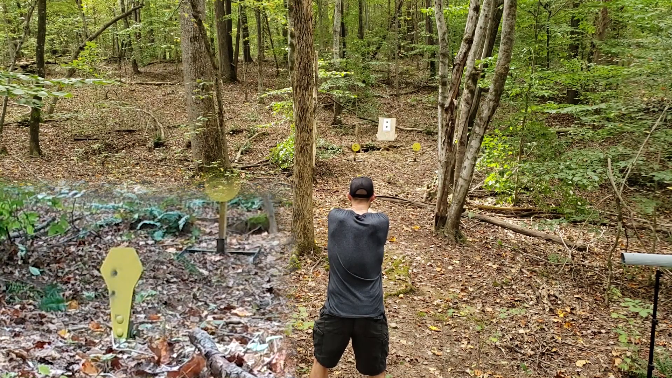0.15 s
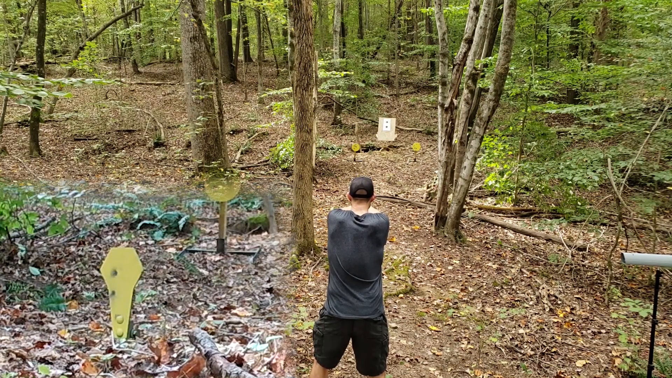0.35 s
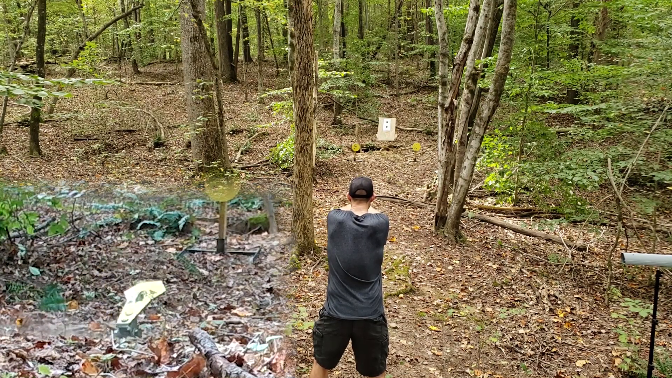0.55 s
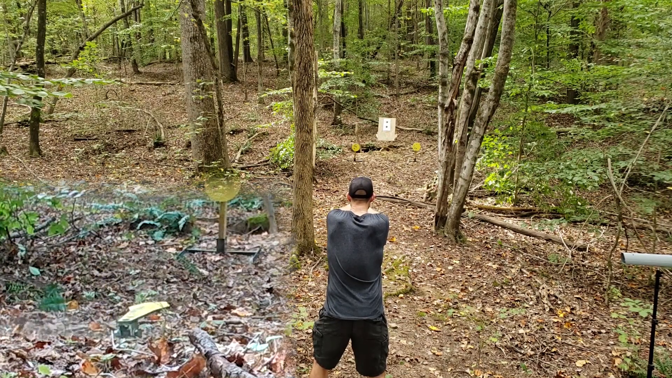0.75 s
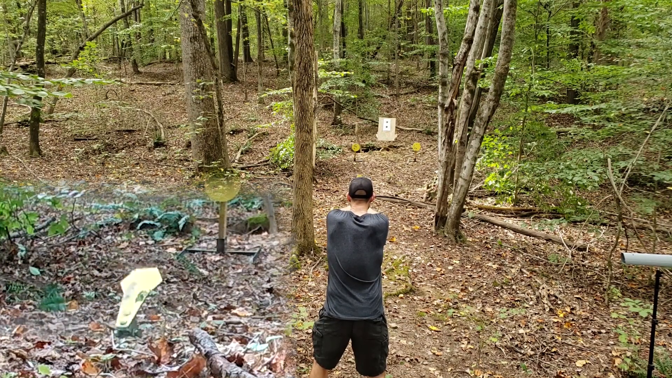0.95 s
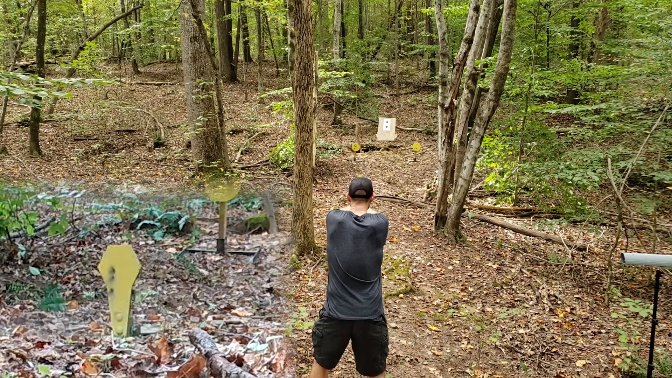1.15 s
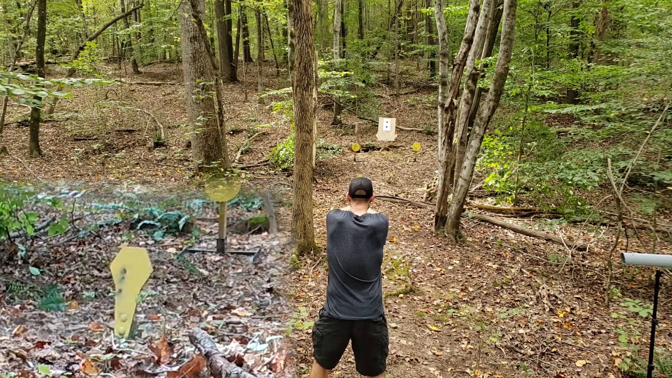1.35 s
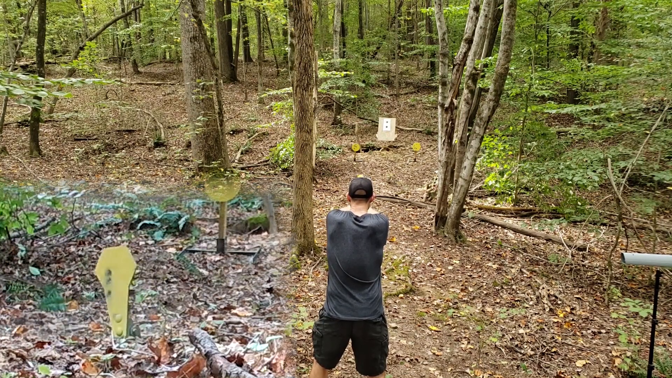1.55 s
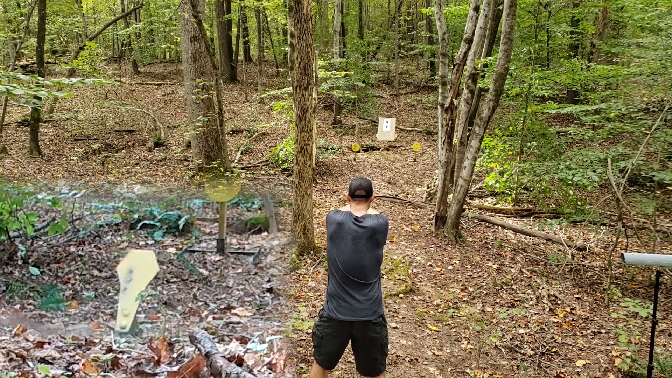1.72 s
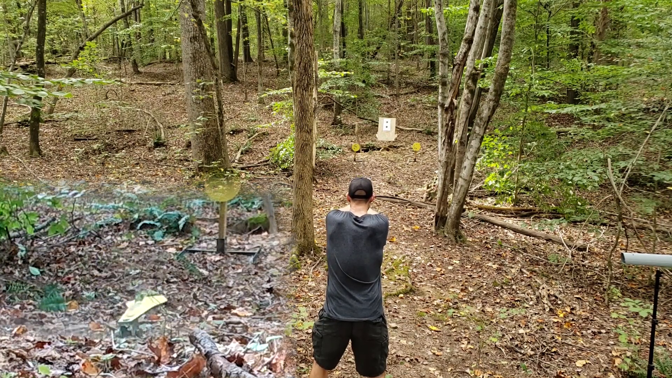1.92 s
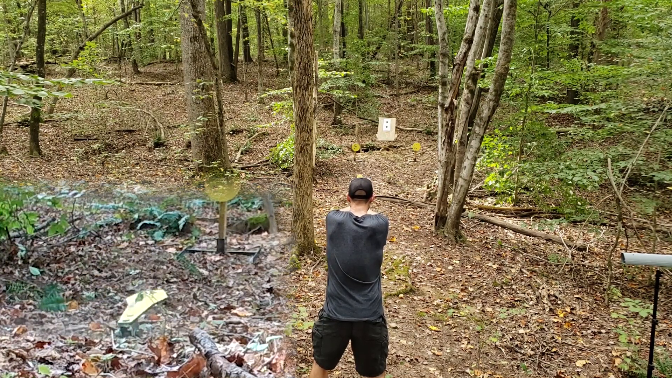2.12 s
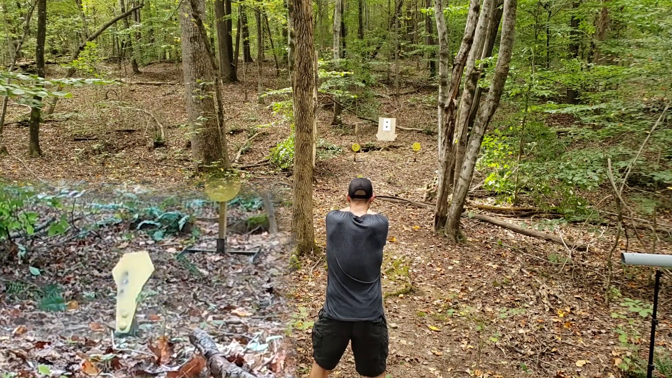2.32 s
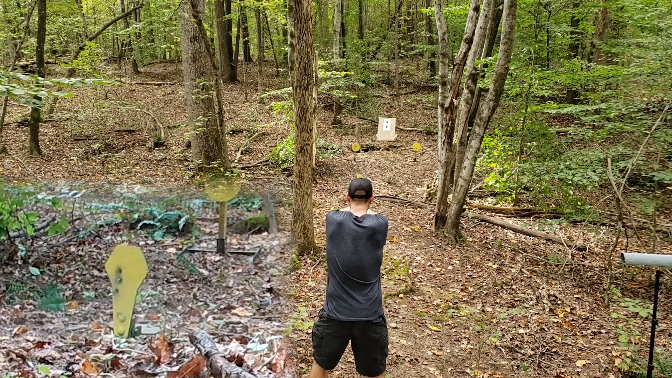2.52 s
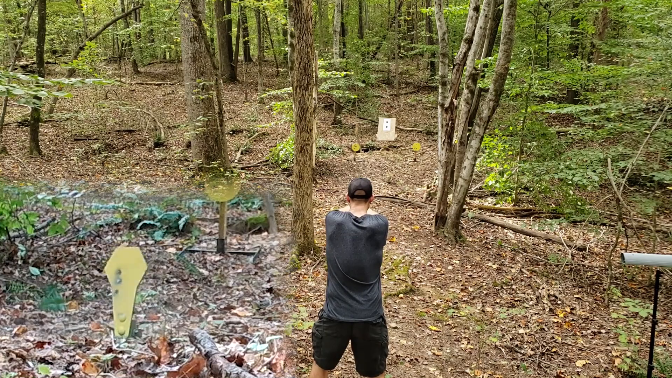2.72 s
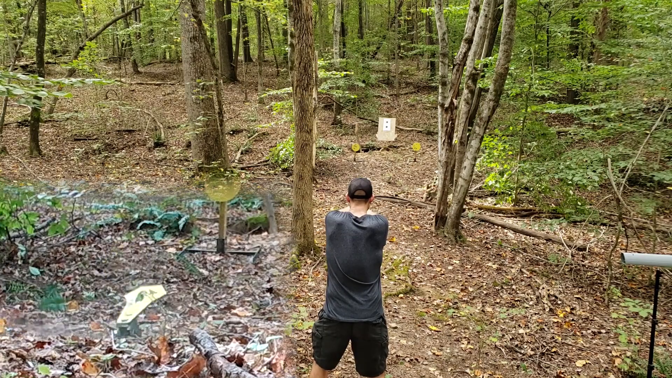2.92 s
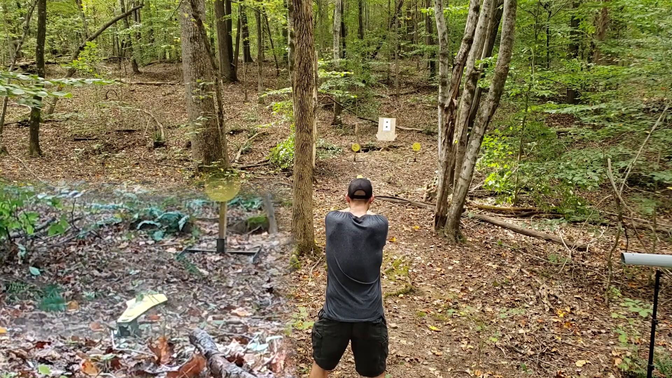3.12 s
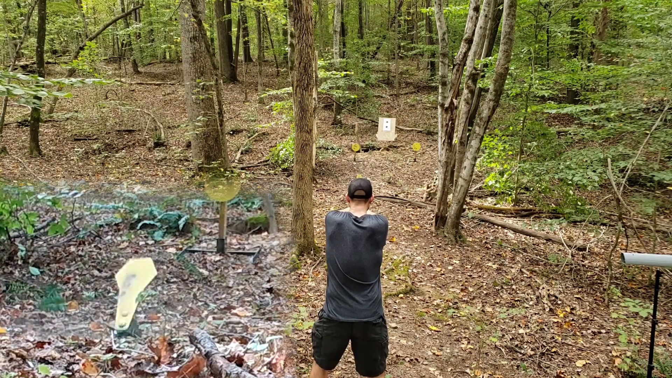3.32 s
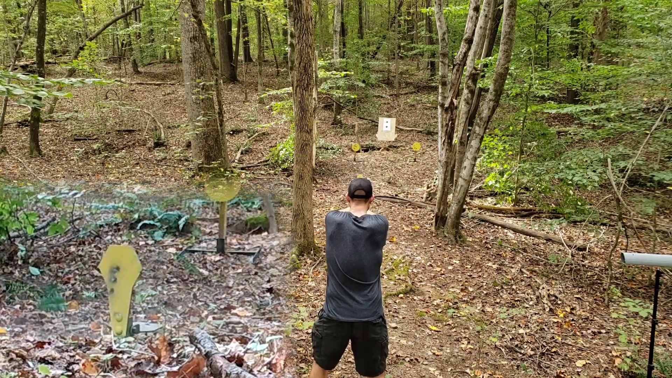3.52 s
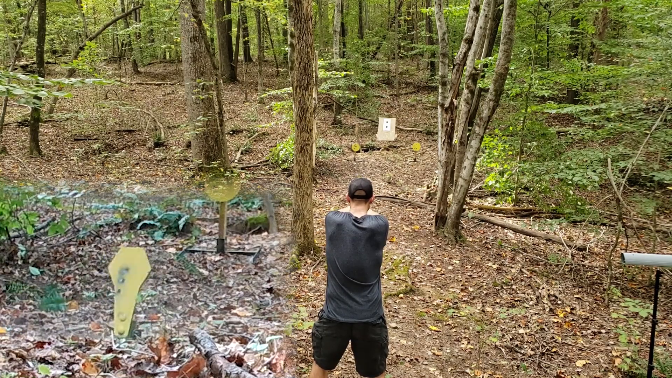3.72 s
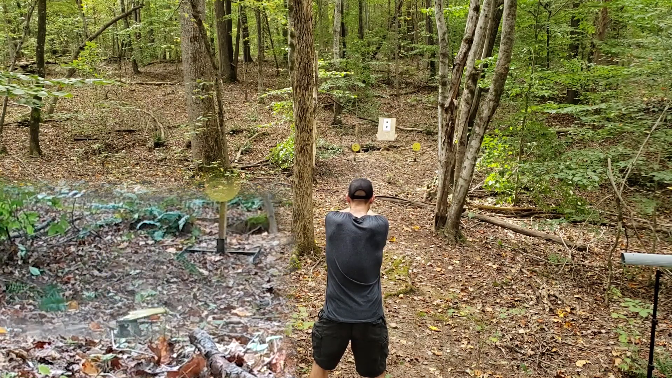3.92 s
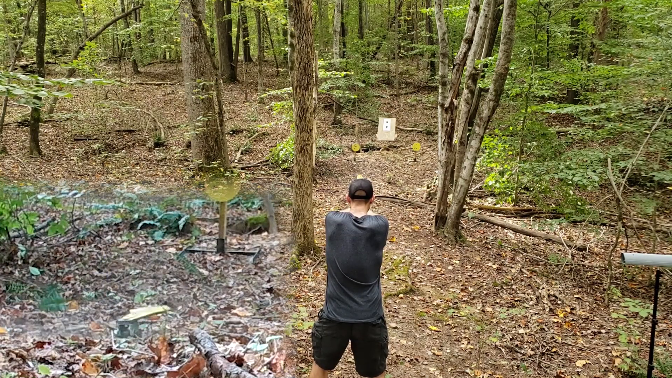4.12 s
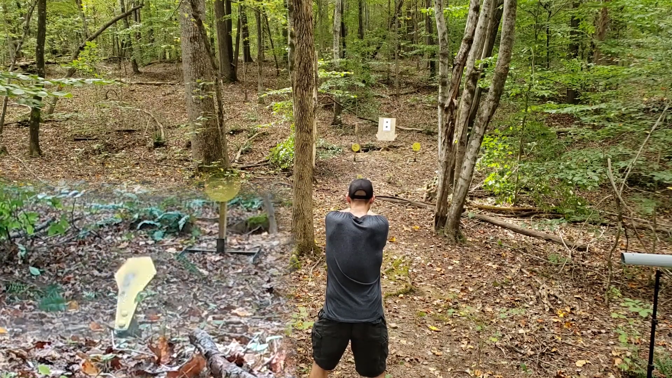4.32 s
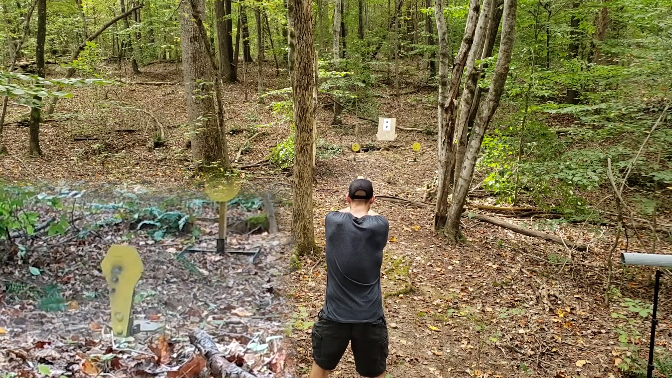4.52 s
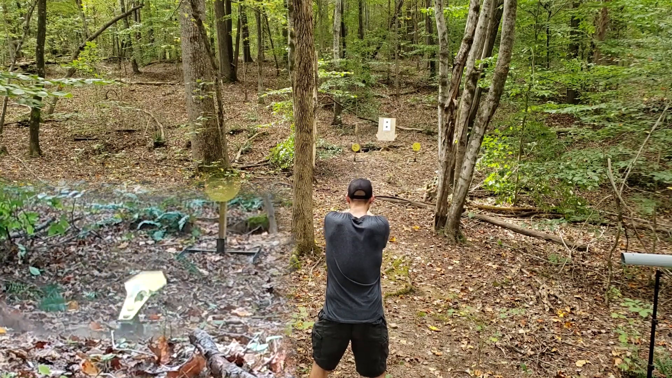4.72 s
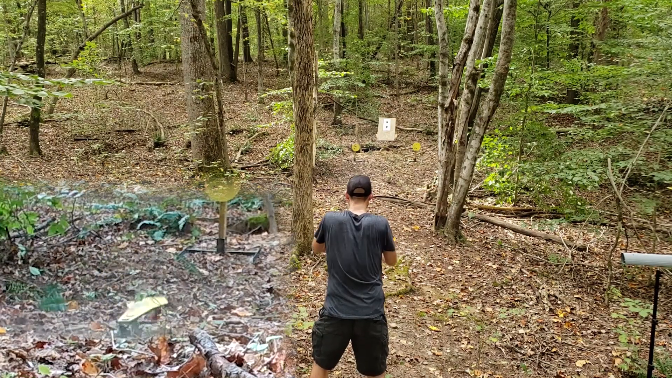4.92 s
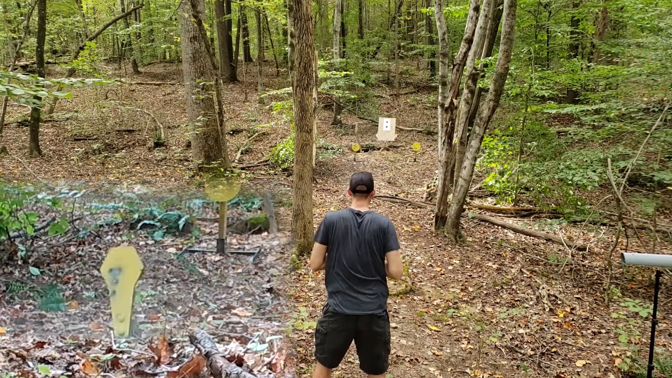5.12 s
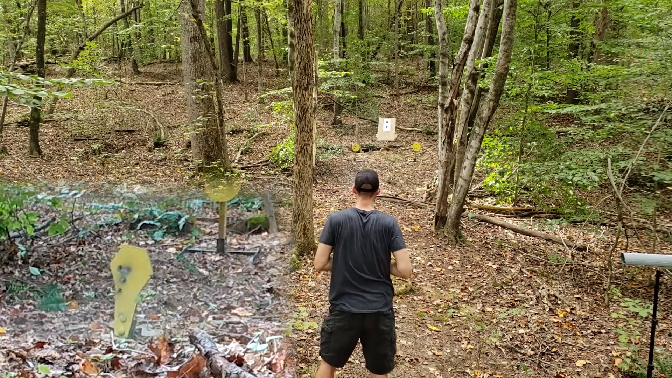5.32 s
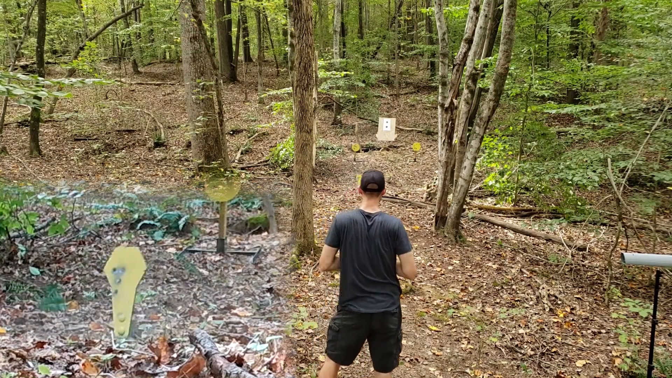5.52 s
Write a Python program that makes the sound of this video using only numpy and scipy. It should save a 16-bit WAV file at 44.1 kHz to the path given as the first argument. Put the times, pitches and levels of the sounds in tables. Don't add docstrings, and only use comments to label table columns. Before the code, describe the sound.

After a brief quiet of leaf hiss and distant engine hum, five harsh gunshots come at a steady pace. Every blast is flattened by the overloaded mono microphone, with a bright metallic strike just behind it and a long muffled tail through the trees. The steel target thuds and ticks back onto its stop after each shot, and the last echo fades.

```python
import sys
import numpy as np
from scipy import signal
from scipy.io import wavfile
from scipy.ndimage import uniform_filter1d

SR = 44100
rng = np.random.default_rng(int(sys.argv[2]) if len(sys.argv) > 2 else 0)


def waveform_to_disk(signal):
    frames = np.transpose(np.atleast_2d(signal))
    scaled = np.clip(frames, -1, 1) * 32767
    samples = np.round(scaled).astype(np.int16)
    wavfile.write(sys.argv[1], SR, samples)


def undo_db(level):
    steps = np.asarray(level, float) / 20
    return 10 ** steps


N = 249289


def rms_one(x):
    return x / np.sqrt(np.mean(x ** 2) + 1e-20)


def at_hz(table, hz, column=1):
    points = np.array(table)
    return np.interp(np.log(hz), np.log(points[:, 0]), points[:, column])


def clicks(times_s, gains):
    out = np.full(N, 1e-18)
    np.add.at(out, np.round(np.asarray(times_s) * SR).astype(int), gains)
    return out


def ring(x, hz, t60_s):
    radius = undo_db(-60 / (t60_s * SR))
    angle = 2 * np.pi * hz / SR
    return signal.lfilter([0, np.sin(angle)], [1, -2 * radius * np.cos(angle), radius ** 2], x)


def burst(times_s, level_db, low_hz, high_hz, t60_s):
    shape = signal.lfilter([1], [1, -undo_db(-60 / (t60_s * SR))], clicks(times_s, undo_db(level_db)))
    sos = signal.butter(2, [low_hz, high_hz], "band", fs=SR, output="sos")
    return signal.sosfilt(sos, shape * rng.standard_normal(N))


def drift(rate_hz):
    knots = rng.standard_normal(400)
    return np.interp(np.arange(N) / SR * rate_hz, np.arange(len(knots)), knots)


def bands(source):
    edges_hz = 28 * 2 ** (np.arange(29) / 3)
    for k, (low, high) in enumerate(zip(edges_hz, edges_hz[1:])):
        sos = signal.butter(2, [low, high], "band", fs=SR, output="sos")
        yield np.sqrt(low * high), signal.sosfilt(sos, source[k % 2])


def coloured(spectrum, patchy_db, rate_hz):
    noise = 0
    for hz, band in bands(rng.standard_normal((2, N))):
        noise = noise + undo_db(at_hz(spectrum, hz) + patchy_db * drift(rate_hz)) * band
    return rms_one(noise)


# pitch_hz [Hz], level_db [dB per Hz]
AIR_COLOUR = [(120, -30), (200, -11), (230, -21), (365, -19), (1130, -22), (3000, -42.5), (4750, -57.5),
              (7600, -48), (15500, -57.5)]


def air_in_leaves():
    return undo_db(-61.5) * coloured(AIR_COLOUR, 4.2, 2.5)


# pitch_hz [Hz], level_db [dB per Hz]
TRAFFIC_COLOUR = [(20, -15.5), (35, -8), (55, -1.5), (75, 5.5), (100, -6.5), (160, -6), (230, -26),
                  (400, -70)]


def traffic():
    level_db, fade_db_per_s = -57, 0.5
    lorry_s, lorry_length_s, lorry_db, lorry_hz = 5.5, 0.078, -52.5, 49.9
    t = np.arange(N) / SR
    rumble = undo_db(level_db - fade_db_per_s * t) * coloured(TRAFFIC_COLOUR, 2.3, 1.6)
    swell = undo_db(lorry_db) * np.exp(-((t - lorry_s) / lorry_length_s) ** 2)
    return rumble + swell * np.sin(2 * np.pi * lorry_hz * t)


# start_s [s], pitch_hz [Hz], level_db [dB]
ENGINE = [
    (0, 113.4, -50),
    (0.799, 112.2, -42),
    (1.6, 110.4, -49.5),
    (2.2, 109.6, -51),
    (3.2, 108.2, -52.5),
    (4.099, 106.7, -56.5),
    (5.65, 104.6, -53),
]


def far_engine():
    s, hum_hz, hum_db = np.transpose(ENGINE)
    t = np.arange(N) / SR
    phase = 2 * np.pi * np.cumsum(np.interp(t, s, hum_hz) + 1.5 * drift(16.)) / SR
    waver_db = 3.5 * drift(13.)
    return undo_db(np.interp(t, s, hum_db) + waver_db) * np.sin(phase)


# pitch_hz [Hz], level_db [dB], t60_s [s]
LOW_RING = [(6877, -1, 0.024), (6890, -4.5, 0.0099), (7160, -12, 0.022), (7340, -17.5, 0.015),
            (4770, -13, 0.011), (6700, -42.5, 0.3), (6760, -40, 0.25)]


def steel(times_s, level_db):
    chance_db = 2.0 * rng.standard_normal((len(times_s), len(LOW_RING)))
    return sum(ring(clicks(times_s, undo_db(level_db + db + chance_db[:, k])), hz, t60_s)
               for k, (hz, db, t60_s) in enumerate(LOW_RING))


# delay_ms [ms], pitch_hz [Hz], level_db [dB], t60_s [s]
STAND_THUD = [(1, 1300, 0, .02), (3, 700, -3, .02), (6, 440, 0, .035)]
# [dB over ring, the last touch]
FALLS = [
    (1.146, -51, 13, -0.5),
    (2.429, -58, 20.5, 1.5),
    (3.47, -54, 14, -7.5),
    (4.4496, -57.5, 18, -23),
    (5.1612, -50, 12, -32.5),
]


def target_clacks():
    touches = []
    for start_s, fall_db, fall_thud_db, settle_db in FALLS:
        touches.append((start_s, fall_db, fall_thud_db))
        touches.append((start_s + .018, fall_db + 1.5, fall_thud_db - 16))
        touches.append((start_s + .180, fall_db + settle_db, fall_thud_db - 11.5))
    s, ring_db, thud_db = np.transpose(touches)
    ping = ring(clicks(s, undo_db(ring_db - 12.5)), 6880, 0.07) + steel(s, ring_db - 14)
    tick = burst(s, ring_db - 11, 3700, 7300, 0.17)
    thud = sum(ring(clicks(s + ms / 1000, undo_db(ring_db + thud_db + db + 2.5)), hz, t60_s)
               for ms, hz, db, t60_s in STAND_THUD)
    return ping + tick + thud


# pitch_hz [Hz], t60_s [s]
HIGH_RING = [
    (11420, 0.11),
    (11598, 0.17),
    (11610, 0.4),
]
# start_s [s], low_ring_db [dB], high_ring_db [dB], upper_share [0-1], clank_db [dB]
STRIKES = [
    (0.407, -12, -32, 0.9, -9.5),
    (1.6969, -12.5, -34, 0.78, -9),
    (2.7726, -15.5, -36, 0, -9),
    (3.756, -10, -43, 0.4, -7),
    (4.6589, -6.5, -36.5, 0.2, -8.5),
]


def bullet_strikes():
    s, low_db, high_db, upper, clank_db = np.transpose(STRIKES)
    s = s + .0006
    upper = np.clip(upper, .02, 1)
    shares = (1 - upper, upper, 0.028)
    high = sum(ring(clicks(s, undo_db(high_db + 12.5) * share), hz, t60_s)
               for share, (hz, t60_s) in zip(shares, HIGH_RING))
    clank = burst(s, clank_db + 14.5, 650, 1700, 0.055) + burst(s, clank_db - 13, 3100, 6900, 0.065)
    knock = ring(clicks(s, -undo_db(clank_db + 5.5)), 1350, 0.011)
    crack = burst(s, clank_db + 6.5, 2500, 6500, 0.0061)
    return steel(s, low_db + 6.0) + high + clank + knock + crack


# pitch_hz [Hz], level_db [dB per Hz]
TAIL_COLOUR = [(53, -46.5), (90, -1.5), (272, -3.5), (393, -1), (721, -5), (935, -5.5), (2040, -10),
               (2600, -19), (3200, -26.5), (4000, -18), (5100, -27.5), (6400, -31.5), (8100, -31.5),
               (10000, -32.5), (13000, -39), (15500, -30.5)]
# pitch_hz [Hz], near_t60_s [s, near trees], far_t60_s [s, far wood],
# far_start_db [dB]
TAIL_DECAY = [(100, .25, .8, -12), (300, .4, 1.8, -12), (1000, .6, 2.2, -12), (2500, .6, 1.8, -14),
              (5000, .55, 1.05, -13), (8000, .35, .9, -12), (15000, .35, .8, -12)]


def wood(trunks_per_s, spread_db, same):
    size = 3 * SR // 2
    t = np.arange(size) / SR
    hit = rng.random((2, size)) < trunks_per_s * (1 + t / .08) ** 2 / SR
    strength = undo_db(spread_db * rng.standard_normal((2, size)))
    echoes = rng.standard_normal((2, size)) * strength * hit
    echoes /= np.sqrt(np.minimum(trunks_per_s * (1 + t / 0.16) ** 2 / SR, 1))
    out = np.zeros(N + size)
    for s, _, tail_db in SHOTS:
        leaves = rng.standard_normal((2, size))
        tail = 0
        for hz, band in bands(np.sqrt(same) * rms_one(echoes) + np.sqrt(1 - same) * leaves):
            near = undo_db(-60 * t / at_hz(TAIL_DECAY, hz, 1))
            far = undo_db(at_hz(TAIL_DECAY, hz, 3) - 60 * t / at_hz(TAIL_DECAY, hz, 2))
            tail = tail + undo_db(at_hz(TAIL_COLOUR, hz)) * (near + far) * band
        start = round(s * SR)
        out[start:start + size] += undo_db(tail_db + 22.0) * np.minimum(t / 0.013, 1) * tail
    return out[:N]


# delay_ms [ms], level_db [dB], pitch_hz [Hz]
FAR_RETURNS = [(60.04, -16.5, 390), (88.8, -22.5, 1100), (102.8, -25.5, 1190), (135.2, -21, 410),
               (189, -49, 4400), (233, -31.5, 747), (242, -35, 156), (322, -32, 1220)]
# delay_ms [ms], level_db [dB], pitch_hz [Hz], t60_ms [ms]
NEAR_RETURNS = [(0.2, 22, 680, 9), (3.1, 20, 370, 6), (5.95, 7, 920, 12), (10.1, 3, 600, 16),
                (13.6, 13, 480, 7), (15.7, 2, 620, 22), (20.2, -3, 230, 10), (27.7, 3, 560, 6)]
# start_s [s], blast_db [dB], tail_db [dB]
SHOTS = [
    (0.3851, -3.5, -23.5),
    (1.6746, -3, -23),
    (2.750, -3, -23.5),
    (3.7335, -3, -22.5),
    (4.6373, -4, -23),
]


def blasts():
    push_ms, push_db, leak_hz, rise_hz = 9.4, -4, 18, 3800
    s, blast_db, _ = np.transpose(SHOTS)
    chance_db = 1.8 * rng.standard_normal((len(s), len(NEAR_RETURNS)))
    near = sum(ring(clicks(s + ms / 1000, undo_db(blast_db + db + chance_db[:, k])), hz, t60_ms / 1000)
               for k, (ms, db, hz, t60_ms) in enumerate(NEAR_RETURNS))
    near = signal.lfilter(*signal.butter(2, rise_hz, fs=SR), near)
    half_turn = np.linspace(0, np.pi, round(push_ms * SR / 1000)).clip(0, 3.14)
    hump = np.sin(half_turn) ** .35
    swing = np.convolve(clicks(s + .0044, undo_db(push_db)), hump)[:N]
    swing -= np.convolve(clicks(s, undo_db(push_db)), hump[::2] ** 3)[:N]
    swing = signal.lfilter(*signal.butter(1, leak_hz, "high", fs=SR), swing)
    far = sum(ring(clicks(s + ms / 1000, undo_db(db)), hz, 10. / hz + 0.06) for ms, db, hz in FAR_RETURNS)
    return swing - near + far


def scene():
    background = air_in_leaves() + traffic() + far_engine()
    target = target_clacks() + bullet_strikes()
    gun = wood(trunks_per_s=600., spread_db=4.0, same=.9) + blasts()
    return (background + target + gun)[None]


# pitch_hz [Hz], step_db [dB over band level], empty_share [0-1 of bands]
COARSENESS = [(100, -32, 0), (1000, -24, 0), (3300, -11, 0), (5000, -2, .2), (7000, 0, .3), (9000, 6, .35),
              (15000, 7, .4)]


def coarse_camera(x, spread_db):
    frame, shift, band_bins = 941, 420, 7
    window = np.sin(np.pi * (np.arange(2 * frame) + .5) / (2 * frame))
    setup = dict(window=window, nperseg=2 * frame, noverlap=frame, fs=SR)
    hz, _, spectrum = signal.stft(np.pad(x[0], (shift, 0)), **setup)
    starts = np.arange(0, len(hz), band_bins)
    band = np.arange(len(hz)) // band_bins
    level = np.exp(np.add.reduceat(np.log(abs(spectrum) + 1e-12), starts) / band_bins)
    step = (level * undo_db(spread_db * rng.standard_normal(level.shape)))[band]
    step *= undo_db(at_hz(COARSENESS, hz + 1))[:, None]
    luck = np.repeat(rng.random(level.shape), 2, axis=1)[:, :level.shape[1]]
    tonal = np.maximum.reduceat(abs(spectrum), starts) > 4.5 * level
    tonal |= np.log(level) > uniform_filter1d(np.log(level), 15, axis=0) + 1.2
    step *= np.where(tonal, .07, 1)[band]
    kept = (luck[band] > at_hz(COARSENESS, hz + 1, 2)[:, None]) | tonal[band]
    rounded = kept * step * np.round(spectrum / step)
    return signal.istft(rounded, **setup)[1][None, shift:shift + N]


def top_cut(x):
    return signal.sosfilt(signal.butter(12, 16190, fs=SR, output="sos"), x)


def record(dry):
    shelf_hz, shelf_db, cutoff_hz = 7350, -12.5, 16150
    peak_hz, peak_width_hz, peak_db = 11500, 450, 9
    dip_hz, dip_width_hz = 7950, 800
    flat = np.clip(dry, -.98, .98)
    low = signal.sosfiltfilt(signal.butter(6, shelf_hz, fs=SR, output="sos"), flat)
    peak = signal.lfilter(*signal.iirpeak(peak_hz, peak_hz / peak_width_hz, fs=SR), flat)
    dulled = low + undo_db(shelf_db) * (flat - low + undo_db(peak_db) * peak)
    dipped = signal.lfilter(*signal.iirnotch(dip_hz, dip_hz / dip_width_hz, fs=SR), dulled)
    coarse = coarse_camera(dipped, spread_db=4.0)
    cut = signal.sosfilt(signal.cheby2(10, 60, cutoff_hz, fs=SR, output="sos"), coarse)
    return top_cut(np.clip(cut, -1, 1))


dry = scene()
out = record(dry)
waveform_to_disk(out)
```